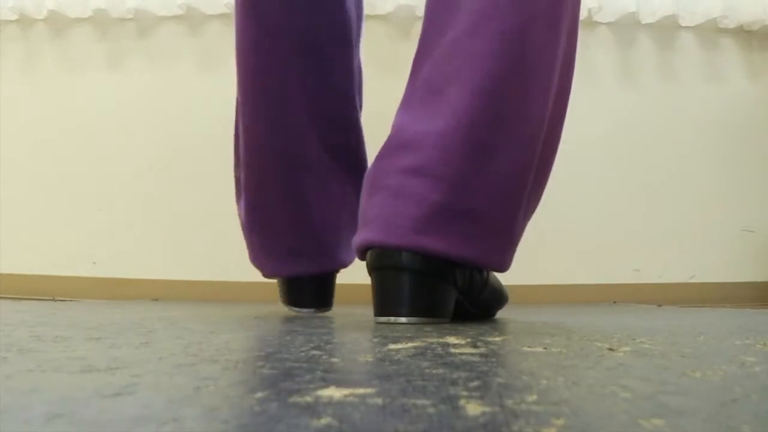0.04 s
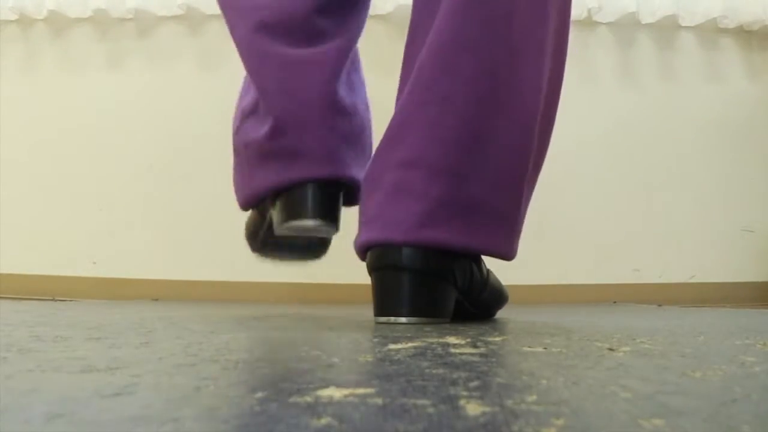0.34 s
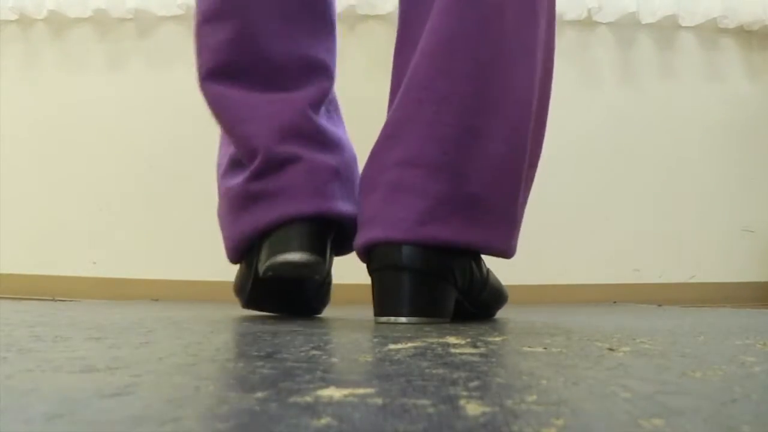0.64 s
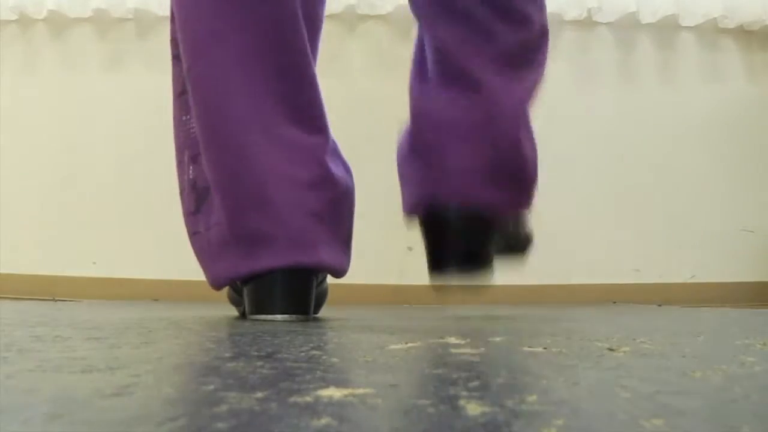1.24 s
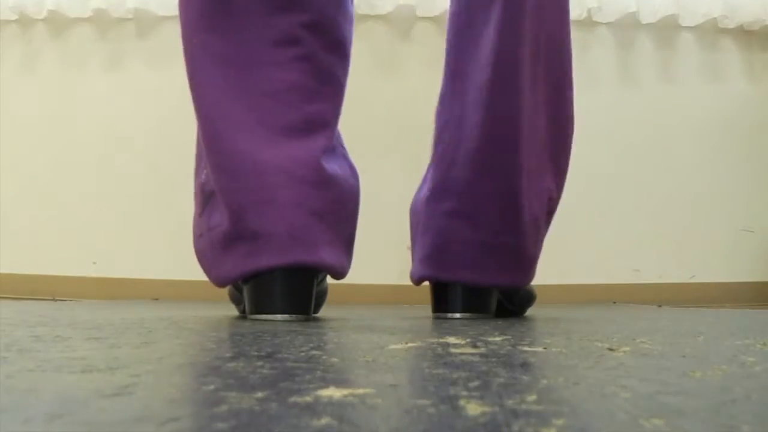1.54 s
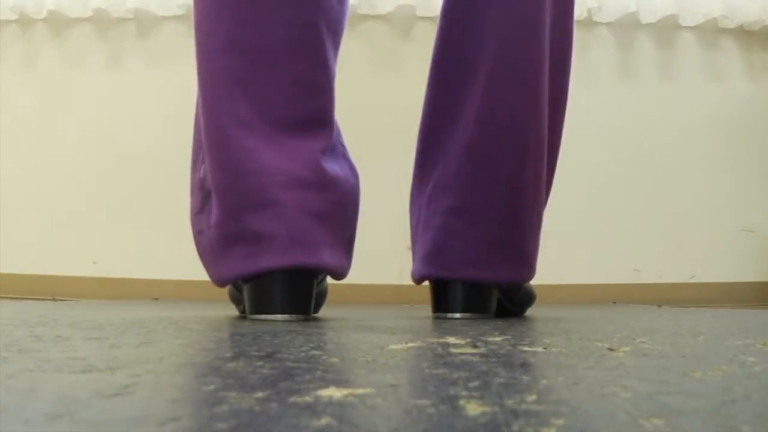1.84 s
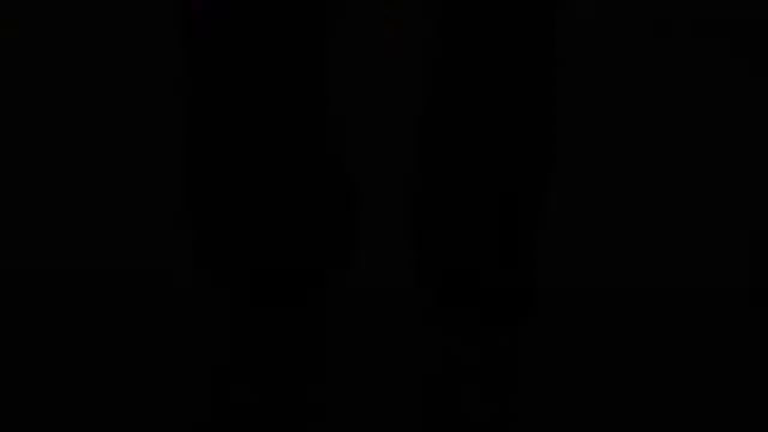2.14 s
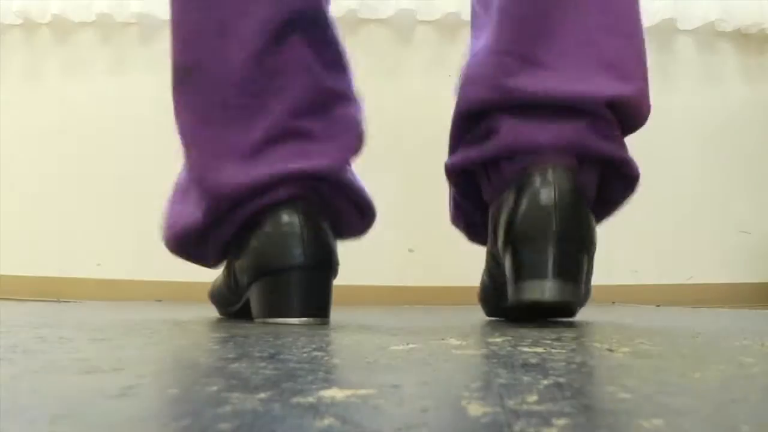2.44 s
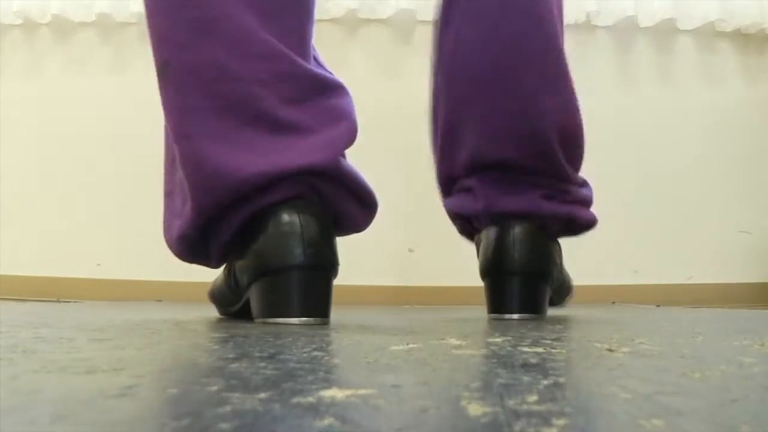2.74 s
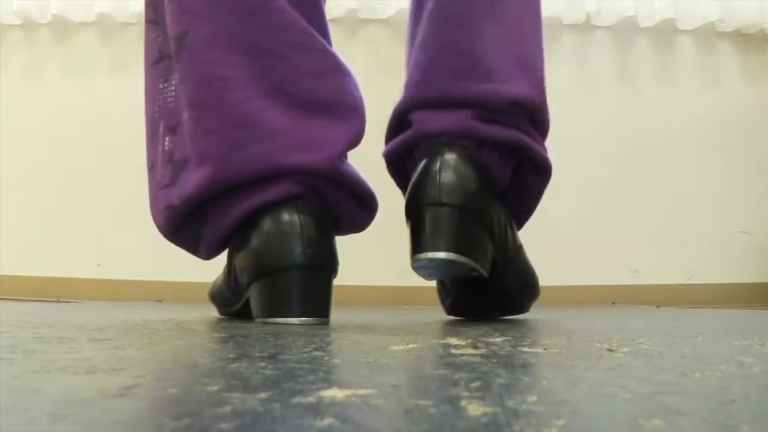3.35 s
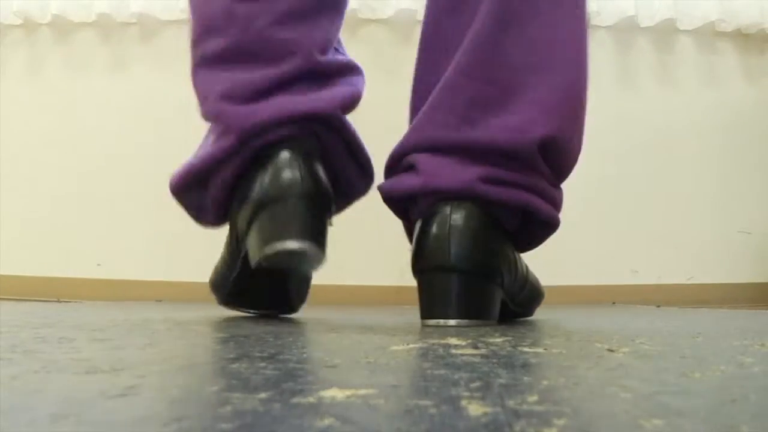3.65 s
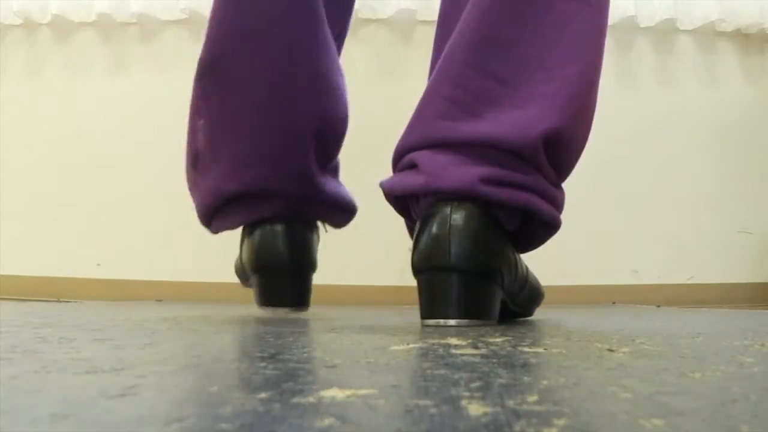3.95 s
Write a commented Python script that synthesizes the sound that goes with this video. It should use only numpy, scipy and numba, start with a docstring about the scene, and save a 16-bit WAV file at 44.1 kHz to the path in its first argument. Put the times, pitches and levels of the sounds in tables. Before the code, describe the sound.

Tap shoes strike a hard floor with sharp metallic taps, each echoing briefly.

```python
"""Tap shoes on a hard floor in a bare studio, heard close up at floor level.
Each blow rings the metal plate, knocks the sole and thumps the floor; light touches tick in between.
Ventilation rumbles underneath, and the room's bass fades from an earlier stamp.
Gain control lets a blow's first milliseconds clip, then holds the echo level until it dies away."""
import sys
import numpy as np
from scipy import signal
from scipy.fft import rfft, irfft
from scipy.io import wavfile
from numba import njit

SR = 44100
rng = np.random.default_rng(int(sys.argv[2]) if len(sys.argv) > 2 else 0)


def generate_wav(sig):
    """Save sig (samples, or channels by samples) to the path in sys.argv[1] as 16-bit PCM at SR."""
    pcm = np.round(np.clip(np.atleast_2d(sig).T, -1, 1) * 32767).astype(np.int16)
    wavfile.write(sys.argv[1], SR, pcm)


N = 176400
T = np.arange(SR // 8) / SR  # time axis of one contact [s]
SIDE_SIGN = np.array([[1], [-1]])  # left, right


def amp(db):
    """Decibels to gain."""
    return 10 ** (np.asarray(db) / 20)


def unit(x):
    """Scale to the energy of a 10 ms full-scale burst."""
    return x * np.sqrt(SR / 100 / np.sum(x ** 2))


def add(track, start_s, x):
    """Mix x into the track at start_s."""
    i = int(start_s * SR)
    track[i:i + len(x)] += x[:N - i]


def contour(f, hz, values):
    """Interpolate on a log-frequency axis."""
    return np.interp(np.log(f + 1), np.log(hz), values)


# Ventilation noise spectrum: (frequency [Hz], relative density [dB])
VENT_SPECTRUM = [(20, -6), (70, -10), (140, -36), (290, -37.5), (450, -13), (1000, -15.5), (3000, -15.5),
                 (8000, -24.5), (16000, -31.5)]
# Ventilation hum: (frequency [Hz], RMS level [dB])
VENT_HUM = [(140, -59), (296, -62), (1130, -57.5)]

def ventilation(noise_db=-50.5):
    """Low air rumble with faint hum and hiss."""
    t, f = np.arange(N) / SR, np.arange(N // 2 + 1) * SR / N
    shape = amp(contour(f, *np.array(VENT_SPECTRUM).T))
    mid, side = irfft(rfft(rng.standard_normal((2, N))) * shape)
    hum = sum(amp(db) * np.sqrt(2) * np.sin(2 * np.pi * hz * t) for hz, db in VENT_HUM)
    return amp(noise_db) * (mid + side * SIDE_SIGN) / mid.std() + hum


def room_boom(band_hz=(115, 256), start_db=-33.5, t60_s=0.76):
    """Room bass still fading from an earlier stamp."""
    band = signal.butter(3, band_hz, "band", fs=SR, output="sos")
    bass = signal.sosfilt(band, rng.standard_normal(N + SR))[SR:]
    return bass / bass.std() * amp(start_db - 60 * np.arange(N) / SR / t60_s)


# Diffuse tail: (frequency [Hz], t60 [s], relative level [dB], side/mid [ratio])
ROOM_BANDS = [(108, 0.69, -5.5, .05), (144.2, 0.85, -2.5, 0.2), (283, 0.6, 4, 0.39), (640, .44, 7, 1.67),
              (1400, .45, 11.5, 1.1), (2426, 0.47, 7, 1.17), (5940, 0.53, -1, 0.93),
              (9700, 0.37, 3.5, 0.85), (14630, 0.29, 7.5, 1.1)]
# Reflections off wall and legs: (left delay [s], right delay [s], level [dB])
EARLY_ECHOES = [(.0062, 0.0038, -13.5), (.0098, 0.012, -19), (0.0175, 0.022, -16.5)]

def room(x, tail_db=-13, build_s=0.002, build_cycles=3.4):
    """Early echoes, then a diffuse tail; its bass builds slowest, lasts longest and is near mono."""
    t, f = np.arange(SR) / SR, np.arange(SR // 2 + 1)
    bands_hz = np.array(ROOM_BANDS)[:, 0]
    noise = rfft(rng.standard_normal((2, SR)))
    response = np.zeros((2, SR))
    for (hz, t60_s, db, width), one_band in zip(ROOM_BANDS, np.eye(len(bands_hz))):
        mid, side = irfft(noise * contour(f, bands_hz, one_band))
        stereo = (mid + width * side * SIDE_SIGN) / np.hypot(1, width)
        build = 1 - np.exp(-(t / (build_s + build_cycles / hz)) ** 2)
        response += stereo * build * amp(db - 60 * t / t60_s)
    response *= amp(tail_db) / np.sqrt(SR / 30)
    for left_s, right_s, db in EARLY_ECHOES:
        response[0, int(left_s * SR)] += amp(db)
        response[1, int(right_s * SR)] += amp(db)
    return signal.fftconvolve(response, x[None], axes=1)[:, :N]


def knock(hz, tau_s):
    """Heavily damped resonance: swells and dies within a few cycles."""
    return unit(T * np.exp(-T / tau_s) * np.sin(2 * np.pi * hz * T))


# Free modes of a shoe plate: (frequency [Hz], relative level [dB], t60 [s])
PLATE_MODES = [(2600, -7, 0.075), (3490, 4.5, 0.04), (4570, 3, 0.034), (5700, -8, 0.038),
               (7020, -19, 0.044), (8200, -4, 0.027), (10370, -14, 0.1), (11950, -15, .025)]

def plate_ring(detune=0.04, scatter_db=3):
    """The plate rings freely, a little differently at each contact."""
    ring = 0
    for hz, db, t60_s in PLATE_MODES:
        envelope = amp(db + scatter_db * rng.standard_normal() - 60 * T / t60_s)
        mode_hz = hz * (1 + detune * rng.standard_normal())
        ring += envelope * np.sin(2 * np.pi * mode_hz * T)
    return unit(ring)


def scuff(band_hz=(1600, 5500), tau_s=0.005):
    """The plate slides briefly on the floor."""
    band = signal.butter(2, band_hz, "band", fs=SR, output="sos")
    return unit(signal.sosfilt(band, rng.standard_normal(len(T)) * np.exp(-T / tau_s)))


# Light plate contacts: (time [s], level [dB], pitch [Hz], ring re tick [dB])
LIGHT_TOUCHES = [(0.0693, -35, 2407, 2), (1.2528, -36, 2110, -19), (2.3239, -33.5, 3020, 1),
                 (2.372, -45, 2080, 3), (2.4198, -26.5, 3480, 5.5), (2.6875, -25.5, 5350, 1.5),
                 (2.9502, -25, 2600, -12), (2.9567, -23.5, 3180, -7), (3.258, -35.5, 2560, 3.5),
                 (3.3352, -31, 4860, 18), (3.495, -26, 2600, 0.5), (3.5223, -33, 4700, -3),
                 (3.8121, -24.5, 3200, -7), (3.9585, -27, 3300, -8)]

def touches(scuff_db=-7.5):
    """A plate brushes the floor or rattles as the foot lifts."""
    track = np.zeros(N)
    for start_s, db, hz, ring_db in LIGHT_TOUCHES:
        tick = knock(hz, tau_s=0.00028)
        ring = amp(ring_db) * plate_ring(detune=0.037)
        add(track, start_s, amp(db) * (tick + ring + amp(scuff_db) * scuff()))
    return track


def crack(top_hz, low_hz=2685, window_tau_s=0.0052):
    """Metal meets floor: a short bright burst, spectrally even within its band."""
    band = signal.butter(2, [low_hz, top_hz], "band", fs=SR, output="sos")
    window = np.exp(-T / window_tau_s)
    burst = rng.standard_normal(len(T))
    for _ in range(6):  # shorten and whiten in turn
        spectrum = rfft(burst * window)
        burst = irfft(spectrum / np.abs(spectrum), len(T))
    return unit(signal.sosfilt(band, burst * window))


def edge_snap(modes_hz=(2540, 4600), modes_db=(1.5, -8), detune=0.077):
    """The plate's edge snaps straight at the listener."""
    return sum(amp(db) * knock(hz * (1 + detune * rng.standard_normal()), tau_s=0.0011)
               for hz, db in zip(modes_hz, modes_db))


# Full blows, part gains re the main plate mode:
# (time [s], level [dB], main mode [Hz], second mode [Hz], second mode [dB], sole [Hz], sole [dB],
#  floor thump [dB], crack [dB], crack top [Hz], edge snap [dB])
TAP_BLOWS = [(0.1731, 7, 2750, 2410, -2.5, 855, -2.5, -12.5, -1.5, 6850, -0.5),
             (0.4370, 7.5, 2690, 3160, -8, 880, 0, -14, -3, 6200, 0.5),
             (0.7605, 4, 1108, 2590, -9, 760, 7, 3, 2, 6440, 3.5),
             (0.9096, -20, 2970, 3980, -3.5, 1000, -5, -1, -2, 11100, -5),
             (1.3079, 0, 2594, 2060, 0, 1026, 6, 3.5, -3, 6200, 0),
             (1.3279, 8.5, 1296, 2106, 1, 650, 10.5, 13.5, 9.5, 7900, -5),
             (1.8949, 0.5, 1379, 1176, 7, 780, 6, -49, 6, 10200, -14),
             (2.4268, 6, 1817, 2184, 0.5, 723, 3.5, 5, 3.5, 7400, -2),
             (2.7331, 5.5, 2203, 2280, -10, 694.4, -4, -4.5, -1.5, 6000, -4),
             (3.0072, 8, 2810, 2060, -3.5, 860, -5.5, -14.5, -4.5, 6100, -2.5),
             (3.2886, 8.5, 2410, 2640, -3, 780, -6.5, -12, -8, 7500, 1.5),
             (3.5653, 6, 2223, 1995, -2, 1050, -2.5, 4, -0.5, 7060, -0.5),
             (3.8458, 0.5, 1590, 2385, 4, 983, 0.5, -5.5, 0, 6240, 5)]

def blows(plate_tau_s=0.00055, ring_db=-22, thump_hz=259):
    """Plate, sole and floor sound together; returns direct sound and room feed."""
    direct, room_feed = np.zeros((2, N))
    direct_gains = amp([1, -7, -7, 0])  # plate, sole, thump, crack [dB re room feed]
    for (start_s, db, main_hz, second_hz, second_db, sole_hz, sole_db,
         thump_db, crack_db, top_hz, snap_db) in TAP_BLOWS:
        plate = knock(main_hz, plate_tau_s) + amp(second_db) * knock(second_hz, plate_tau_s)
        plate += amp(ring_db) * plate_ring()  # a pressed plate hardly rings on
        sole = amp(sole_db) * knock(sole_hz, tau_s=0.00031)
        thump = amp(thump_db) * knock(thump_hz, tau_s=0.00048)
        parts = amp(db) * np.array([plate, sole, thump, amp(crack_db) * crack(top_hz)])
        add(direct, start_s, direct_gains @ parts + amp(db + snap_db) * edge_snap())
        add(room_feed, start_s, parts.sum(axis=0))
    return direct, room_feed


def scene(touch_send_db=5.5, left_over_right_db=1.5):
    """Shoes close and centred, the room's echo leaning left."""
    taps, room_feed = blows()
    ticks = touches()
    echo = room(room_feed + amp(touch_send_db) * ticks) * amp(SIDE_SIGN * left_over_right_db / 2)
    return taps + ticks + echo + room_boom() + ventilation()


@njit
def follow(x, attack, release):
    """One-pole level detector; rise and fall coefficients are per sample."""
    out, level = np.empty(len(x)), 0.
    for i in range(len(x)):
        level += (x[i] - level) * (attack if x[i] > level else release)
        out[i] = level
    return out


def gain_control(x, hold_db=-10, attack_s=0.0093, release_s=0.0073, lag_s=0.0026):
    """Turns loud passages down toward hold_db, late enough to let onsets through."""
    t = np.arange(N) / SR
    level = follow(np.abs(x).max(axis=0), 1 / (attack_s * SR), 1 / (release_s * SR))
    late_level = np.interp(t - lag_s, t, level)
    return x / np.maximum(1, late_level / amp(hold_db))


def limiter(x, threshold_db=2, release_s=0.0011):
    """Fast peak limiter, set above the clipping point."""
    peak = follow(np.abs(x).max(axis=0), 0.94, 1 / (release_s * SR))
    return x / np.maximum(1, peak / amp(threshold_db))


def record(dry, low_cut_hz=90, ceiling=0.97, top_cut_hz=15900):
    """Gain control, limiter, bass roll-off, clipping, top cut."""
    low_cut = signal.butter(2, low_cut_hz, "high", fs=SR, output="sos")
    top_cut = signal.ellip(8, 0.2, 70, top_cut_hz, fs=SR, output="sos")
    x = signal.sosfilt(low_cut, limiter(gain_control(dry)))
    return signal.sosfilt(top_cut, np.clip(x, -ceiling, ceiling))


dry = scene()
out = record(dry)
generate_wav(out)
```